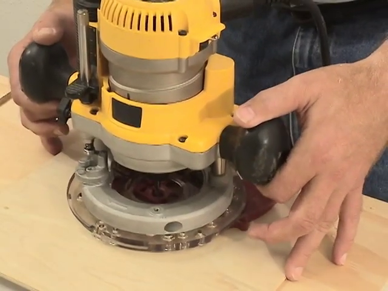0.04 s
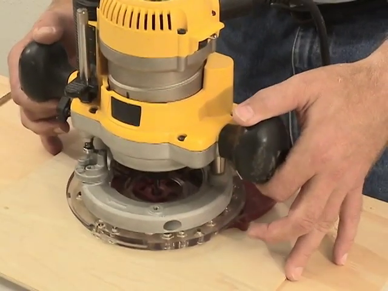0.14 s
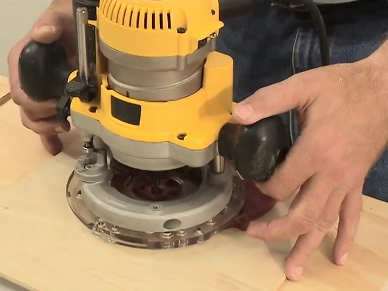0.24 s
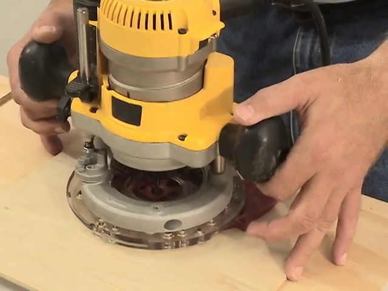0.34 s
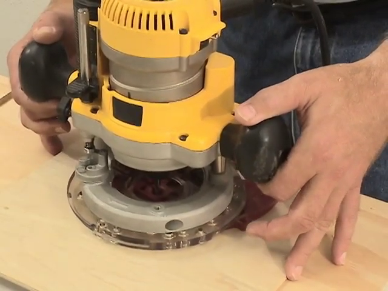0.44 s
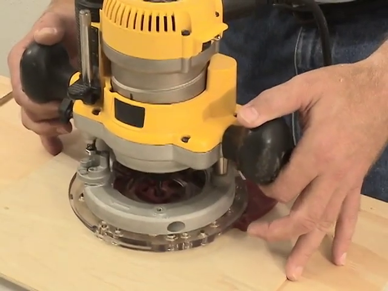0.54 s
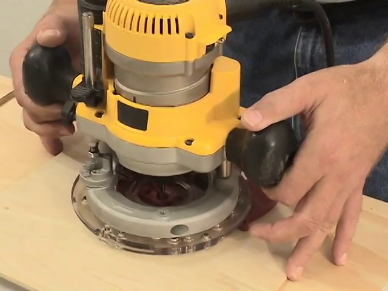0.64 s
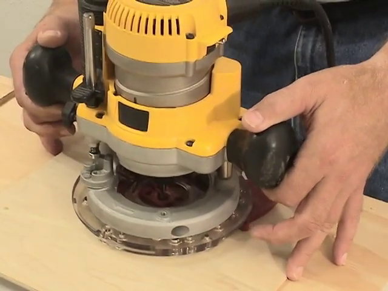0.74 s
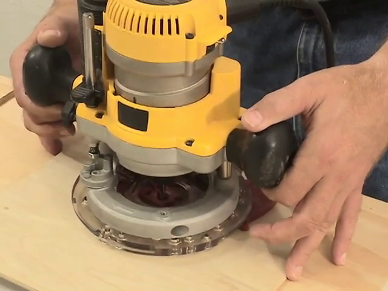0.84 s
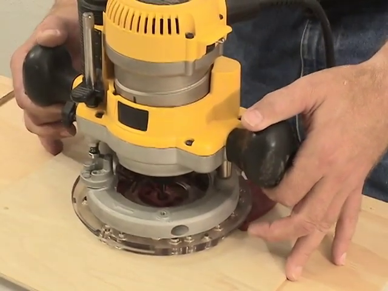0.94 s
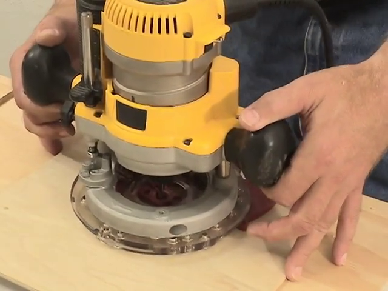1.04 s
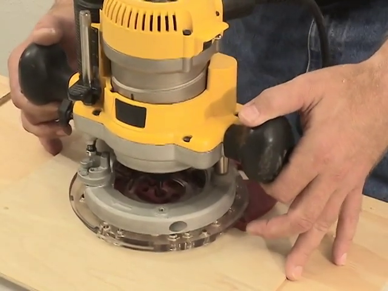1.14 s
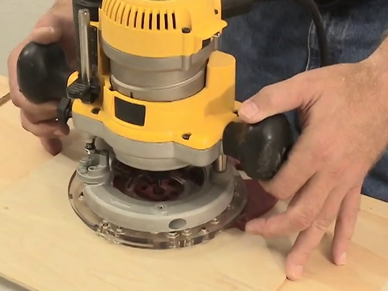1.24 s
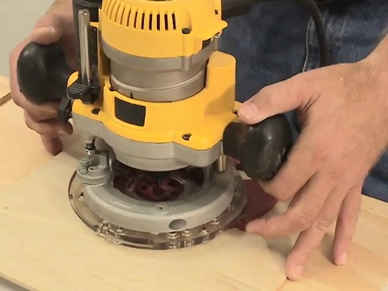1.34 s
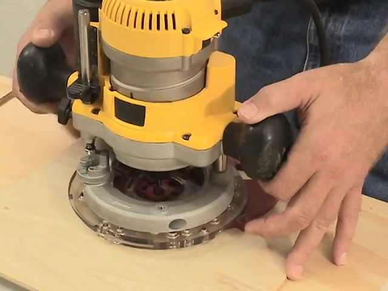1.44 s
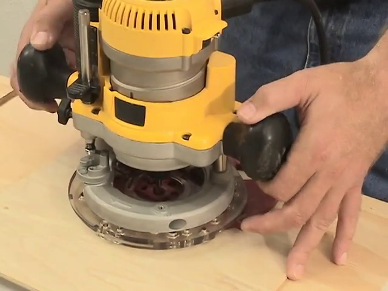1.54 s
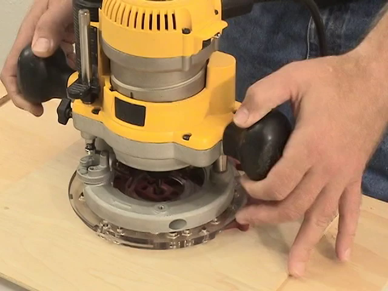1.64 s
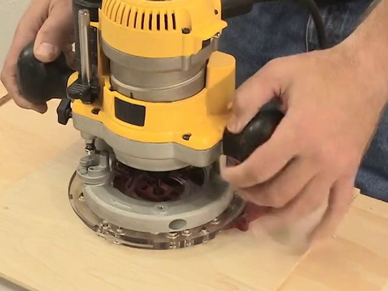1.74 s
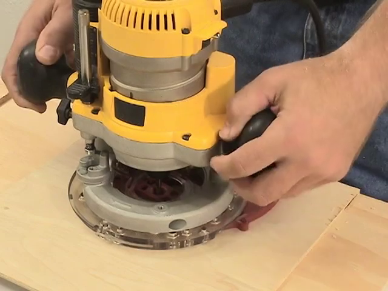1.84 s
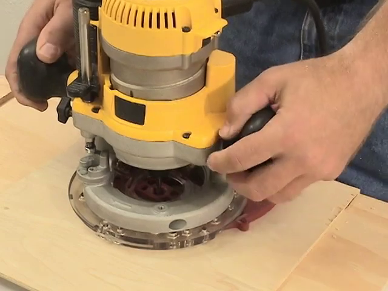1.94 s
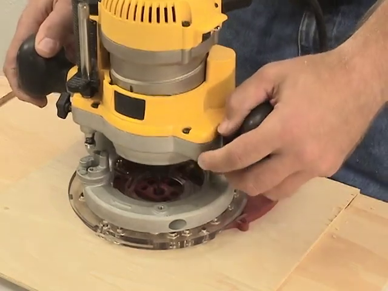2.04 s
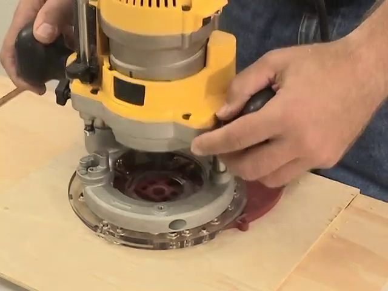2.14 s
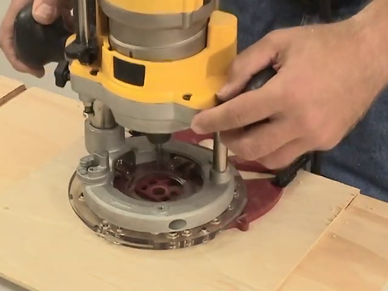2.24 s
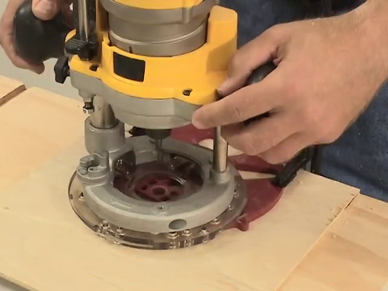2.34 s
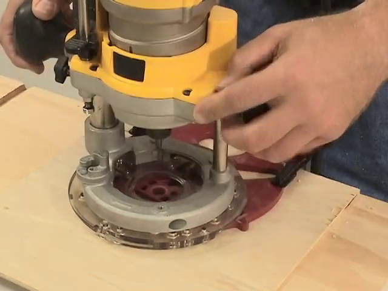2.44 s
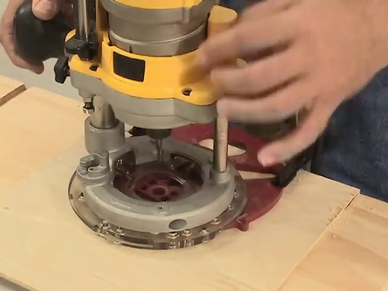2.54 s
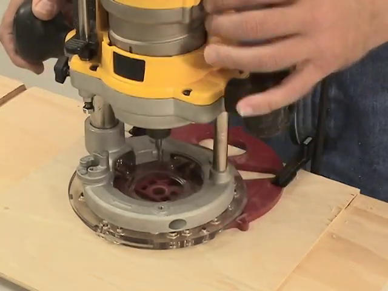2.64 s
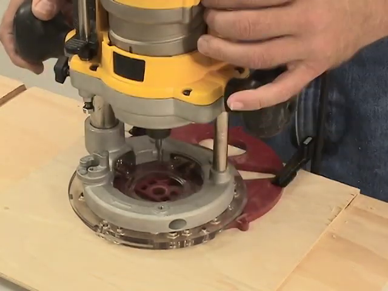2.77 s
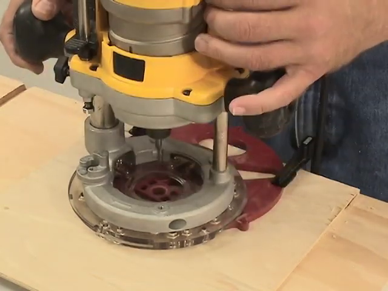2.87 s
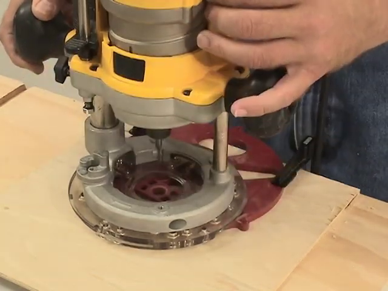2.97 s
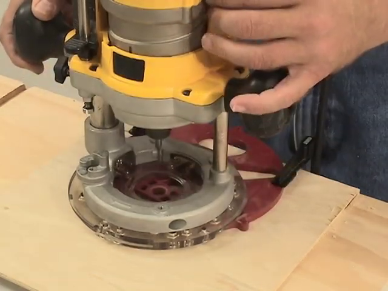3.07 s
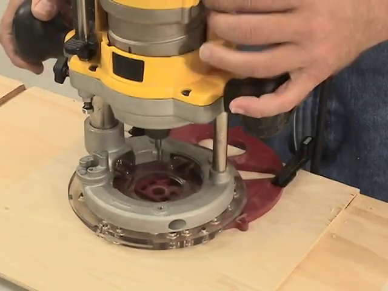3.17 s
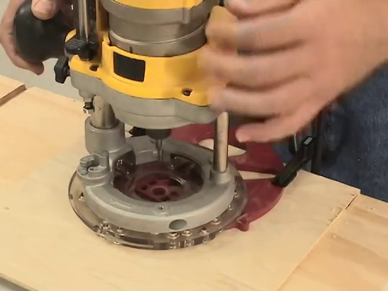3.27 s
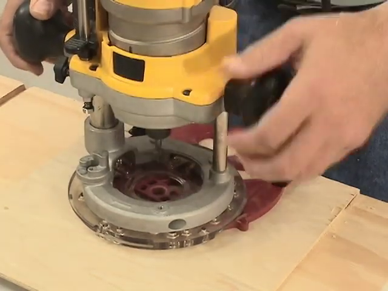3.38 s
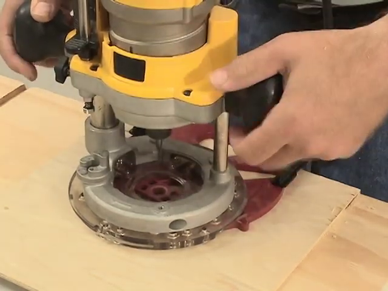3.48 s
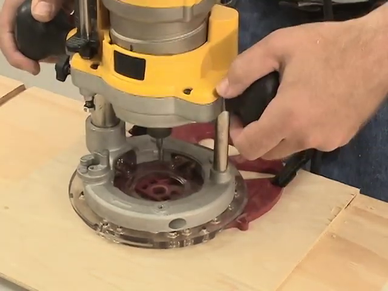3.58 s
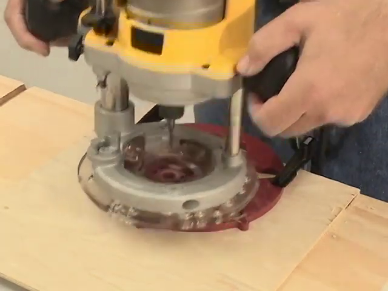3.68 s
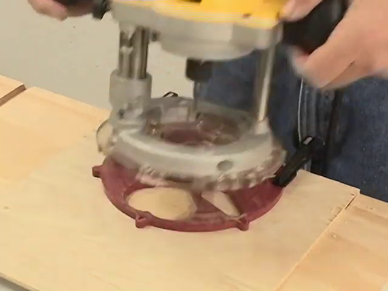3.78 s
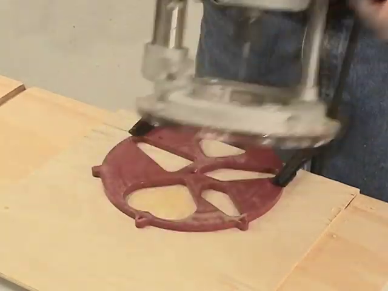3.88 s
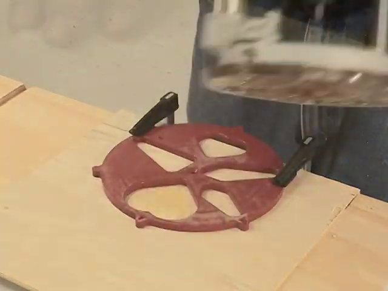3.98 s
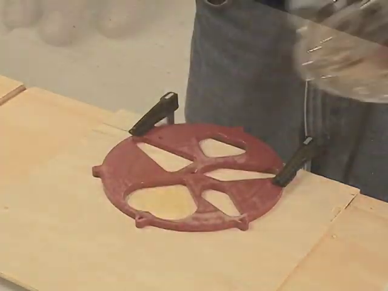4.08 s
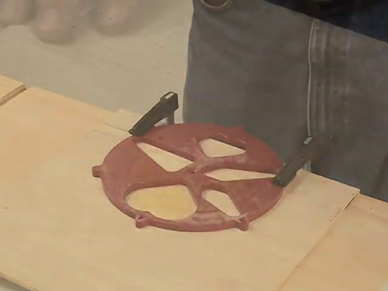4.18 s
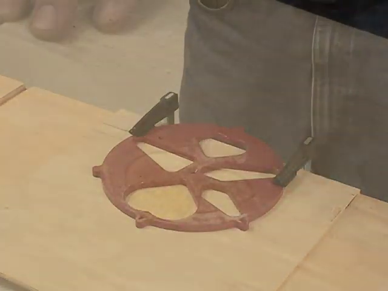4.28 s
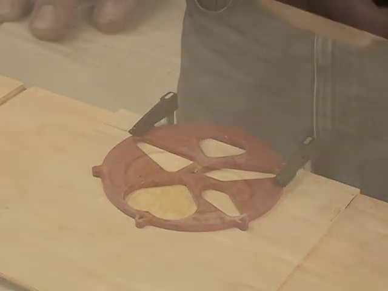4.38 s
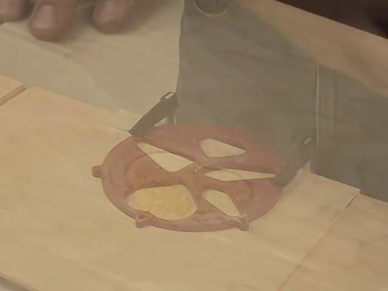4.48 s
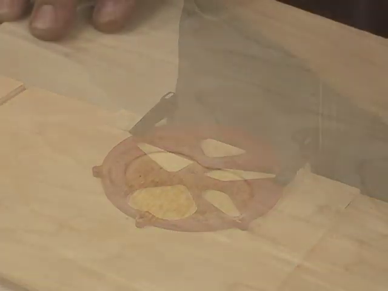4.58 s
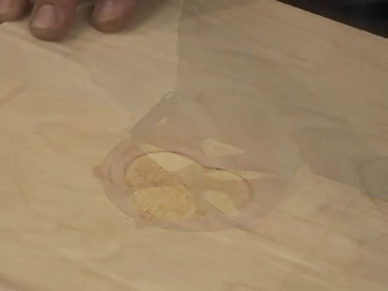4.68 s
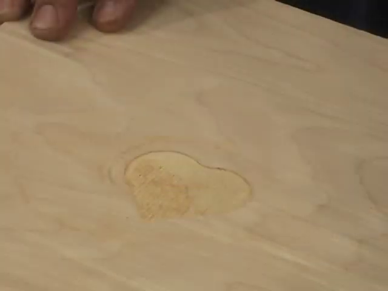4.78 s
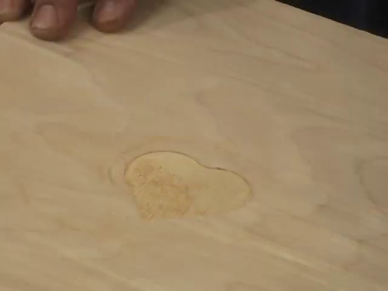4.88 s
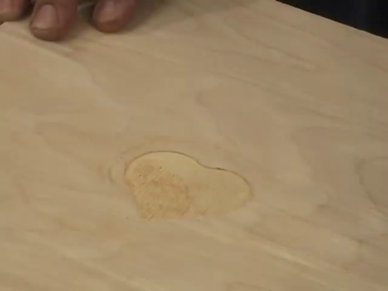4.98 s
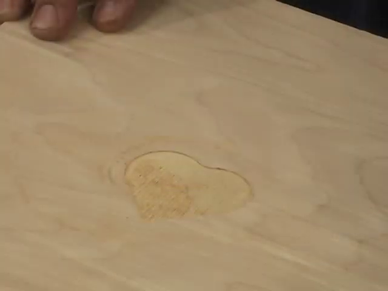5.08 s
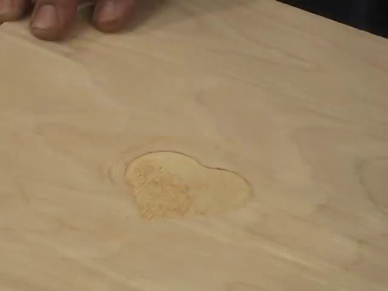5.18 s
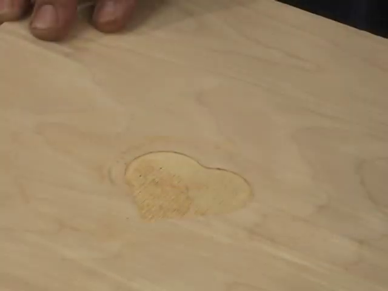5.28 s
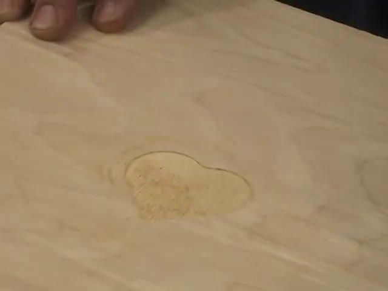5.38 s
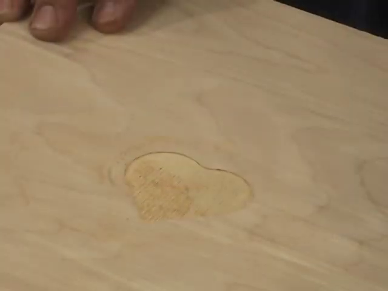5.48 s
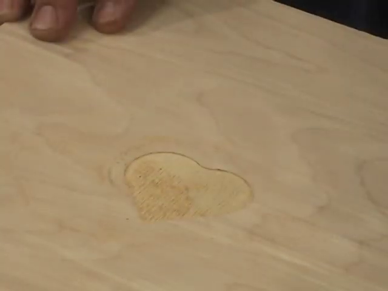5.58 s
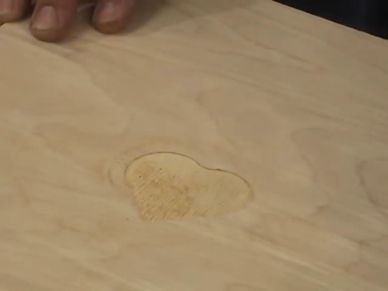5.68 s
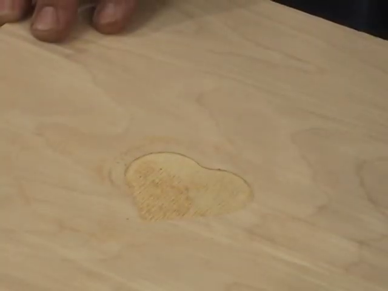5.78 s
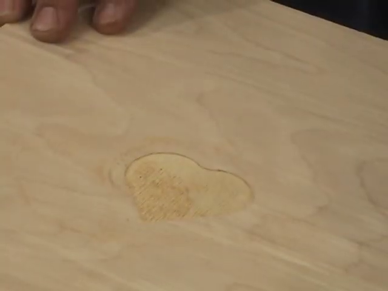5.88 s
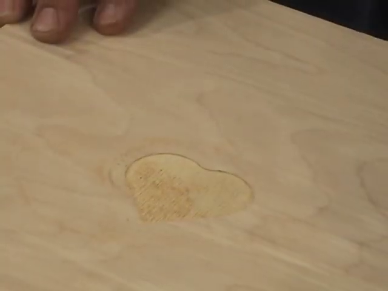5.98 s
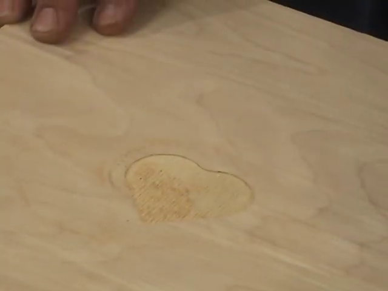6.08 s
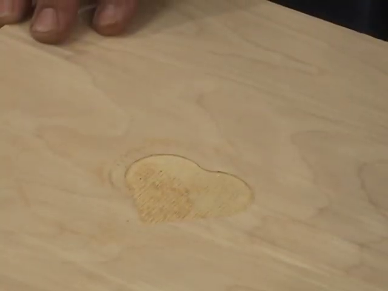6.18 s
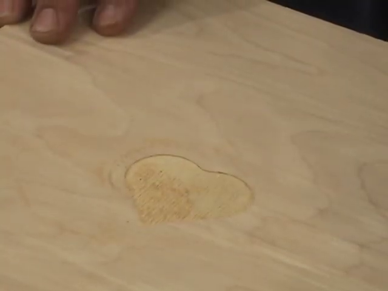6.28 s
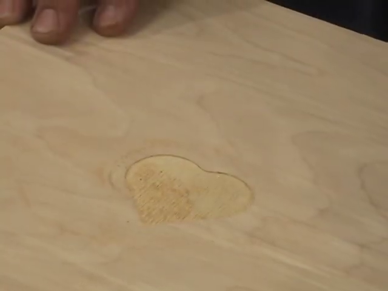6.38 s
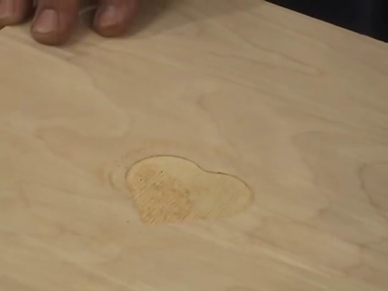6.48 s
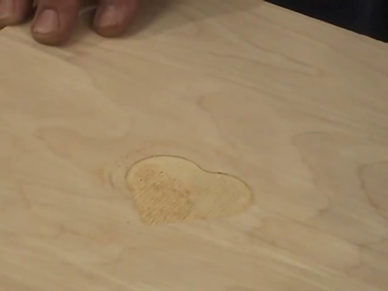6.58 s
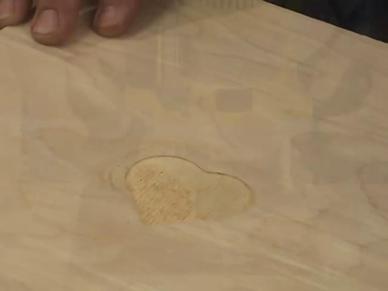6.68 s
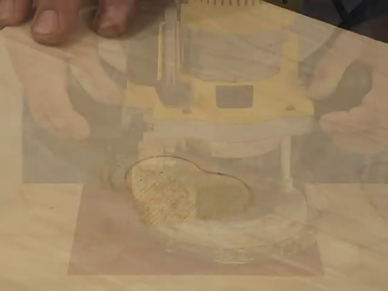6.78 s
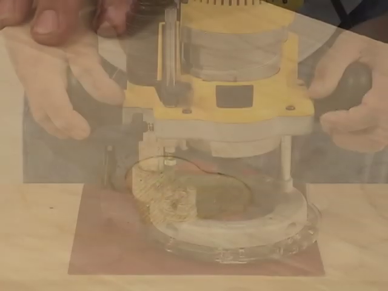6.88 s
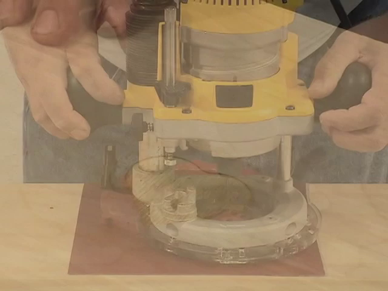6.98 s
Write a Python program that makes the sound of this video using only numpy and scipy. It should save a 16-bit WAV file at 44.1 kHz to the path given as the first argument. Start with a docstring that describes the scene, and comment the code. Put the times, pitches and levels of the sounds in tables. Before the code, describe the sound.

Close stereo pickup of a plunge router running fast over a plywood board: broad airy roar, steady mid hum and a piercing, fluttering whistle. Soft dull thuds accompany the motor rising. Around three seconds it is switched off; pitch begins to sink, a hollow whoosh drops as it is lifted away, and it fades smoothly into a quiet workshop with low rumble, faint hum and hiss. A light scuff on wood comes at the very end.

```python
"""A plunge router runs at full speed on plywood: its fan rushes as coloured noise, while its shaft hums
and its fan blades whistle as sines locked to one shaft angle.
The motor rises on its posts, is switched off, begins to coast down and is lifted away as it fades.
What remains is the quiet workshop, rumble, hum and faint hiss, where something scuffs briefly on the wood."""
import sys
import numpy as np
from scipy import signal
from scipy.fft import rfft, irfft, next_fast_len
from scipy.io import wavfile
from scipy.ndimage import map_coordinates

SR = 44100
rng = np.random.default_rng(int(sys.argv[2]) if len(sys.argv) > 2 else 0)


def master(y):
    """Save y as 16-bit WAV."""
    cut = np.clip(np.atleast_2d(y).T, -1, 1)
    pcm = np.round(cut * 32767)  # scale
    wavfile.write(sys.argv[1], SR, pcm.astype(np.int16))


N = 309580
TIME = np.arange(N) / SR

# how the machine stands: t/s, motor raised/0-1, base lifted off the board/0-1
MACHINE_POSE = [(0, 0.06, 0.03), (2.05, 0.06, 0), (2.27, 1, 0.03), (3.6, 0.92, 0.11), (3.8, 0.97, 0.67),
                (4.4, 1, 1)]
# likeness of the machine noise at the two microphones: f/Hz, correlation
LIKENESS = [(100, 0.16), (290, 0.84), (640, 0.87), (1400, 1), (3100, 0.9375), (6800, 0.97), (10000, 0.27),
            (15000, 1)]
# stereo balance of the machine noise: f/Hz, left minus right/dB
STEREO_BALANCE = [(60, -7), (110, -6), (380, -2), (700, -2.5), (1290, -2), (2380, -0.82), (4400, -0.8),
                  (8120, -3.5), (11000, 6.5), (15000, -4.5)]
# stereo phase of the machine noise: f/Hz, lead of the left/rad
STEREO_LEAD = [(260, 0.24), (1640, 0.68), (1900, 0.045), (7300, 0.21), (8300, 0.89), (10000, 1.97),
               (15000, 0.54)]

RUN_HZ, CREEP_HZ_PER_S = 431.15, .28  # governed shaft speed and its slow creep upward
OFF_S, COAST_S = 3.12, 4.39  # the power is cut; time constant of the coasting shaft
BLADES = 19
BOARD_REACH = 0.42  # lift (0-1) beyond which the board no longer reinforces the machine
# cooling air: gain at full speed on the board, power of speed it follows, change off the board
AIR_DB, AIR_POWER, AIR_LIFT_DB = -25.5, 2.25, -3
# hollow whoosh: lowest resonance with the base down, its fall over the whole lift
WHOOSH_HZ, WHOOSH_FALL_OCTAVES = 2010, .82
# its gain at the peak, the lift (0-1) at which it peaks, half width of that peak in lift
WHOOSH_DB, WHOOSH_LIFT, WHOOSH_SPREAD = -11, 0.74, .17
# shaft hum: trim, power of speed it follows, change off the board
SHAFT_DB, SHAFT_POWER, SHAFT_LIFT_DB = -.3, 3.6, -19
# whistle: trim, power of speed, change off the board, depth of its flicker while the pitch falls
WHISTLE_DB, WHISTLE_POWER, WHISTLE_LIFT_DB, WHISTLE_FLICKER_DB = 0.4, 4.4, -2.5, 3.2
# the router dissolves into the shop: start, length, gain of the shop before that
DISSOLVE_S, DISSOLVE_LENGTH_S, SHOP_UNDER_DB = 3.345, 0.98, -25
TOP_HZ = 15750  # band limit of the recorder


def amp(db):
    """Decibels to gain."""
    return 10 ** (np.asarray(db) / 20)


def unit(x):
    """Scale to rms 1."""
    return x / np.sqrt(np.mean(x ** 2) + 1e-20)


def along(points, hz):
    """(Hz, value) points read on a log frequency axis."""
    f, v = np.transpose(points)
    return np.interp(np.log(hz + 1), np.log(f + 1), v)


def curve(rows, axis=1):
    """One column of a time table, one value per sample."""
    rows = np.asarray(rows)
    return np.interp(TIME, rows[:, 0], rows[:, axis])


def wobble(rate):
    """A smooth random curve, rate knots a second."""
    knots = rng.standard_normal(int(N * rate / SR) + 4)
    return map_coordinates(knots, [TIME * rate])


def filtered(x, response):
    """x shaped by a response of frequency."""
    size = next_fast_len(N + SR // 2)
    spectrum = rfft(x, size) * response(np.fft.rfftfreq(size, 1 / SR))
    return irfft(spectrum, size)[..., :N]


def sides(value):
    """Half of a difference to the left, minus half to the right."""
    return np.array([[.5], [-.5]]) * value


def rush(spectrum, humps, alike, balance, lead):
    """Stereo noise of rms 1: a broad colour with narrower humps and dips."""
    def mid_side_colour(hz):
        db = along(spectrum, hz)
        for centre, width, gain in humps:
            db = db + gain / (1 + (2 * (hz - centre) / width) ** 2)
        # the split between mid and side sets how alike left and right are
        turn = np.arccos(np.clip(along(alike, hz), -1, 1)) / 2
        return amp(db) * np.array([np.cos(turn), np.sin(turn)])

    def stereo_image(hz):
        level = amp(sides(along(balance, hz)))
        phase = np.exp(1j * sides(along(lead, hz)))
        return level * phase

    mid, side = filtered(rng.standard_normal((2, N)), mid_side_colour)
    pair = np.array([mid + side, mid - side])
    return unit(filtered(pair, stereo_image))


def walls(x, wet_db, t60, dull_hz):
    """Bench and walls send back many weak, dull copies, which comb the sound finely; rms 1."""
    t = np.arange(SR // 4) / SR
    echoes = rng.standard_normal(len(t)) * amp(-60 * t / t60) * (t > .003)
    echoes = echoes / np.linalg.norm(echoes)
    answer = signal.fftconvolve(x, echoes[None], axes=1)[:, :N]
    dull_answer = filtered(answer, lambda hz: 1 / (1 + 1j * hz / dull_hz))
    return unit(x + amp(wet_db) * dull_answer)


def strokes(rows, rise):
    """Envelope of events that rise fast and die away exponentially."""
    envelope = 0
    for start, db, t60 in rows:
        age = np.maximum(TIME - start, 0)
        envelope = envelope + amp(db - 60 * age / t60) * (1 - np.exp(-age / rise))
    return envelope


def speed_share():
    """Shaft speed as a share of full speed: held until the power is cut, then decaying."""
    return np.exp(-np.maximum(TIME - OFF_S, 0) / COAST_S)


def lift():
    """How far the base is off the board, 0-1."""
    return np.clip(curve(MACHINE_POSE, axis=2), 0, 1)


def off_board():
    """Share of the board's reinforcement that is lost, 0-1."""
    return np.clip(lift() / BOARD_REACH, 0, 1)


def airflow():
    """Gain of the fan's rush: it sinks with speed and as the machine leaves the board."""
    return amp(AIR_DB + AIR_LIFT_DB * off_board()) * speed_share() ** AIR_POWER


def fan_air():
    """Air blows down past the bit; its colour follows the gap under the motor."""
    # colour of the air in each stance, before resonances: f/Hz, relative density/dB per Hz
    plunged_colour = [(60, -36), (150, -31), (300, -23), (550, -14), (720, -10.5), (1200, -12),
                      (1800, -11.5), (2500, -8), (4800, -7.5), (6400, -3.5), (8200, -8), (10200, -17),
                      (13800, -42), (15400, -38)]
    raised_colour = [(60, -28), (150, -26), (300, -22.5), (550, -13), (720, -9), (1200, -13.5),
                     (1800, -11.5), (2500, -8), (4800, -3), (6400, 1), (8200, -3), (10200, -13.5),
                     (13800, -27.5), (15400, -37)]
    lifted_colour = [(100, -36), (300, -15), (550, -12), (720, -7), (1200, -7.5), (1800, -6), (2500, -2),
                     (3700, 1), (4600, 1), (5900, -4), (7200, -4.5), (8200, -5.5), (10200, -17),
                     (13800, -27)]
    # resonances of the gap between motor and board in each stance: f/Hz, width/Hz, gain/dB
    plunged_gap = [(1880, 330, -10), (2800, 150, 1.5), (3260, 220, -4.5), (4065, 220, -8.5), (6170, 910, 5),
                   (10000, 560, -7), (13450, 1450, 18.5)]
    raised_gap = [(1610, 480, -4.5), (2120, 280, 4), (3168, 210, -7.5), (3730, 190, 3), (4280, 240, 2.5),
                  (5200, 640, -3), (5860, 420, 2), (7340, 1030, 3), (10470, 1100, -6.5), (13870, 940, 7)]
    lifted_gap = [(1860, 300, -1), (3100, 420, -3.5), (15500, 1200, -6)]
    # narrow resonances of the housing: f/Hz, width/Hz, gain/dB
    housing = [(575, 40, -4), (684, 40, 4.5), (847, 25, 2.5), (998, 22, 4), (1105, 20, 4.5),
               (1247, 22, 4.5), (1294, 14, 4), (2880, 20, 3), (2968, 20, 4), (4347, 45, 2)]

    raised = np.clip(curve(MACHINE_POSE, axis=1), 0, 1)
    lifted = lift()
    stances = [((1 - raised) * (1 - lifted), plunged_colour, plunged_gap),
               (raised * (1 - lifted), raised_colour, raised_gap),
               (lifted, lifted_colour, lifted_gap)]
    air = 0
    for share, colour, gap in stances:
        noise = rush(colour, gap + housing, LIKENESS, STEREO_BALANCE, STEREO_LEAD)
        air = air + np.sqrt(share) * noise  # shares add in power
    air = walls(air, wet_db=-10.0, t60=0.17, dull_hz=3920) + gap_whoosh()
    turbulence_db = 0.41 * wobble(25.27)
    return air * airflow() * amp(turbulence_db)


def gap_whoosh():
    """Air in the widening gap resonates ever lower as the base lifts, loudest part of the way up."""
    # modes of the gap: multiple of the lowest resonance, noise width/Hz, relative level/dB
    whoosh_modes = [(1, 380.3, -0.5), (1.85, 395, -4), (3.549, 602, 0)]
    resonance_hz = WHOOSH_HZ * 2 ** (-WHOOSH_FALL_OCTAVES * lift())
    turns = np.cumsum(resonance_hz) / SR
    modes = 0
    for order, width, db in whoosh_modes:
        # a randomly drifting phasor makes a narrow band of noise around each mode
        drift = wobble(width) + 1j * wobble(width)
        modes = modes + amp(db) * np.real(drift * np.exp(2j * np.pi * order * turns))
    swell = 1 / (1 + ((lift() - WHOOSH_LIFT) / WHOOSH_SPREAD) ** 2)
    return modes * amp(WHOOSH_DB + sides(-1.8)) * swell


def rotor():
    """The shaft hums once a turn and the blades whistle; all lines sink together as it coasts."""
    # hum of the unbalanced shaft under power, before trim and loss off the board: t/s, level/dB
    shaft_levels = [(0.05, -43.5), (0.29, -43.5), (0.35, -40.5), (0.63, -47), (0.92, -41.5), (1.02, -45),
                    (1.27, -45.5), (1.38, -41), (1.89, -41.5), (1.95, -46), (2.31, -43), (2.47, -39.5),
                    (3.12, -38)]
    # blade whistle under power, before trim, flutter and loss off the board: t/s, level/dB
    whistle_levels = [(0.0, -48), (0.73, -41), (0.82, -37), (0.97, -46), (1.29, -36.5), (1.54, -40),
                      (1.6, -37), (1.69, -42), (1.77, -35), (1.93, -45), (2.08, -46), (2.16, -27),
                      (2.26, -29.5), (2.35, -52), (2.55, -42), (2.67, -35), (2.78, -40), (3.12, -36)]
    # weak machine lines: multiple of shaft speed, level against the airflow gain/dB
    overtones = [(2, -37), (3, -33), (7.565, -28), (12, -29), (13.08, -24), (24, -37)]

    share = speed_share()
    governed_hz = RUN_HZ + CREEP_HZ_PER_S * np.minimum(TIME, OFF_S)
    speed_hz = governed_hz * share + .15 * wobble(18)
    angle = 2 * np.pi * np.cumsum(speed_hz) / SR

    shaft_db = curve(shaft_levels) + SHAFT_DB + SHAFT_LIFT_DB * off_board() + 0.5 * wobble(11.0)
    shaft = amp(shaft_db + sides(-3.5)) * share ** SHAFT_POWER * np.sin(angle + sides(0.23))

    # eddies make the whistle flutter, partly alike and partly differently at each microphone
    fading_db = 1.5 * wobble(24.9) + 0.81 * np.array([wobble(42.7), wobble(45.2)])
    # the falling pitch meets the room's standing waves: a deeper flicker at a lower mean level
    fading_db += WHISTLE_FLICKER_DB * (wobble(40) - .5) * (TIME > OFF_S)
    whistle_db = curve(whistle_levels) + WHISTLE_DB + WHISTLE_LIFT_DB * off_board() + fading_db
    whistle_gain = amp(whistle_db + sides(-6)) * share ** WHISTLE_POWER
    whistle = whistle_gain * np.sin(BLADES * angle + 0.2 * wobble(120) + sides(0.75))

    weak = 0
    for order, db in overtones:
        weak = weak + amp(db + 2.2 * wobble(8.3)) * np.sin(order * angle + 0.91 * wobble(35))
    weak = weak * airflow() * (1 - lift())
    return np.sqrt(2) * (shaft + whistle + weak)  # sine levels count as rms


def handling():
    """The board thuds dully around the motor's rise; later comes a light, grainy scuff."""
    # dull bumps, before the rise softens them: t/s, level/dB, time to fall 60 dB/s
    bumps = [(1.89, -52, 0.85), (2.33, -55, .35)]
    # scuffs, before the rise softens them: t/s, level/dB, time to fall 60 dB/s
    scuffs = [(6.902, -41.5, .25), (6.933, -47, .16)]
    # colour of the scuffs, before their humps: f/Hz, relative density/dB per Hz
    scuff_colour = [(940, -45), (1600, -20), (2000, -1), (2500, -6), (3000, -12), (3700, -3.5), (4500, 2.5),
                    (5500, -6), (6700, -9), (7900, -3.5), (9200, -13), (13300, -18), (14500, -30)]
    board_colour = [(30, -23), (80, -15), (125, 5), (200, -7), (600, -24), (3000, -70)]  # f/Hz, dB per Hz

    board = rush(board_colour, [], LIKENESS, STEREO_BALANCE, STEREO_LEAD)
    scuff_humps = [(2300, 400, 4), (4400, 700, 3.3)]  # f/Hz, width/Hz, gain/dB
    scuff = rush(scuff_colour, scuff_humps, [(3000, 0.47)], [(3000, -1.5)], [(3000, 0)])
    grain = amp(1.3 * wobble(600))
    thuds = board * strokes(bumps, rise=0.012)
    return thuds + unit(scuff * grain) * strokes(scuffs, rise=.0012)


def shop():
    """Low rumble and a thin high hiss of filtered noise, with a hum of wavering sines."""
    # workshop air, before its humps: f/Hz, relative density/dB per Hz
    room_colour = [(12, -28), (22, -6), (36, -0.5), (70, -7.5), (115, -2.5), (200, -7), (260, -9),
                   (480, -12.5), (720, -16), (1150, -19), (1750, -25.5), (2900, -24), (7500, -35),
                   (14500, -39)]
    # humps of the workshop air: f/Hz, width/Hz, gain/dB
    room_humps = [(34, 9.2, 5.5), (68, 10, 2), (199.4, 37, 3.5), (690, 195, 3.5)]
    # likeness of the workshop air left and right: f/Hz, correlation
    room_alike = [(35, -0.47), (120, 0.35), (250, 0.2), (550, -0.12), (1650, 0.41), (5000, 0.62),
                  (15000, -0.5)]
    # stereo balance of the workshop air: f/Hz, left minus right/dB
    room_balance = [(35, -10), (60, -4), (110, 0), (200, -2.5), (380, -1.5), (700, -4), (1290, -1.5),
                    (2380, 0.5), (8000, -1), (15000, 0)]
    # hum of the shop, before wavering and balance: f/Hz, rms level/dB
    hum_lines = [(120, -58), (208, -65), (328, -67), (566, -66), (2444, -75.5), (2950, -83), (3138, -74.5),
                 (3537, -78)]

    air = rush(room_colour, room_humps, room_alike, room_balance, [(100, 0)])
    air = amp(-45.0 + 0.396 * wobble(7)) * air
    hum = 0
    for hz, db in hum_lines:
        phase = 2 * np.pi * hz * TIME + 0.43 * wobble(6.5)
        hum = hum + amp(db + 2.8 * wobble(7.4)) * np.sin(phase)
    hum = np.sqrt(2) * hum * amp(sides(-7.0))
    hiss_colour = [(14000, -60), (14700, -9.0), (15200, 1.0), (15800, -6)]  # f/Hz, dB per Hz
    hiss = rush(hiss_colour, [], [(15000, 0.55)], [(15000, -1.5)], [(100, 0)])
    return air + hum + amp(-66) * hiss


def scene():
    """The router dissolves into the shop; handling sounds over both."""
    done = np.clip((TIME - DISSOLVE_S) / DISSOLVE_LENGTH_S, 0, 1)
    router = np.cos(np.pi / 2 * done) * (fan_air() + rotor())
    under = amp(SHOP_UNDER_DB)
    workshop = (under + (1 - under) * done) * shop()
    return router + handling() + workshop


def record(dry):
    """The recorder keeps nothing above its band limit."""
    return filtered(dry, lambda hz: hz < TOP_HZ)


dry = scene()
out = record(dry)
master(out)
```